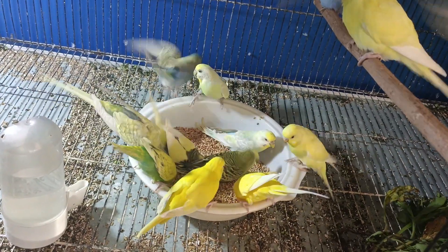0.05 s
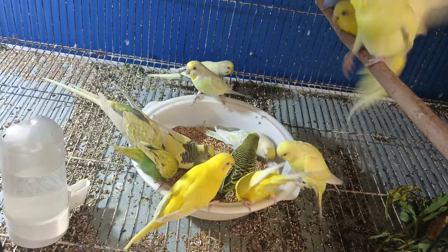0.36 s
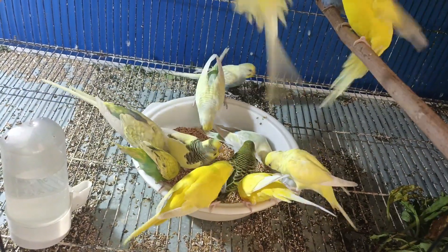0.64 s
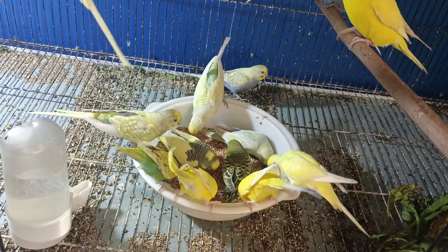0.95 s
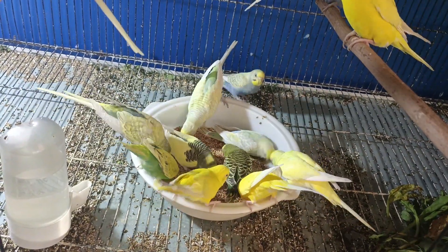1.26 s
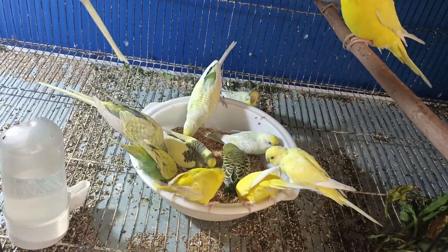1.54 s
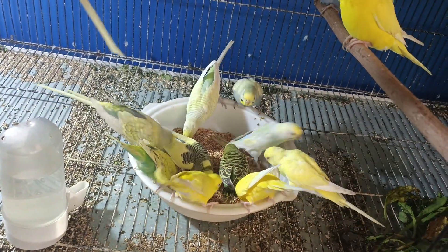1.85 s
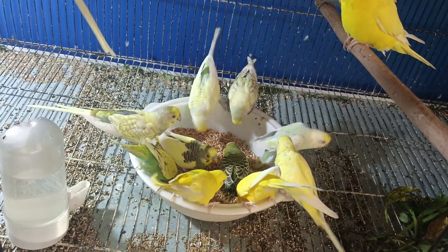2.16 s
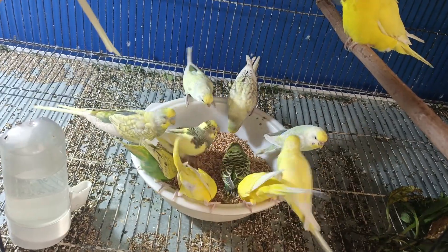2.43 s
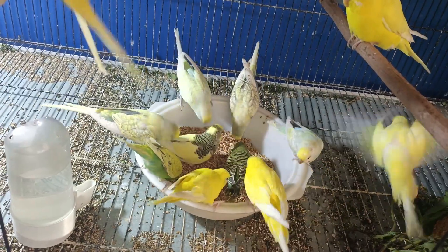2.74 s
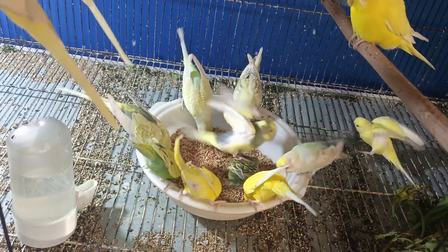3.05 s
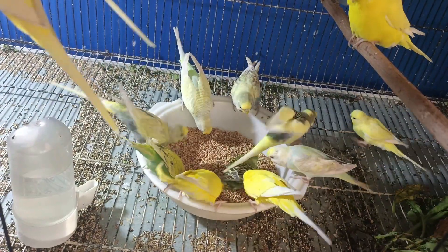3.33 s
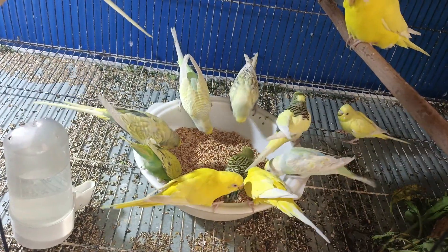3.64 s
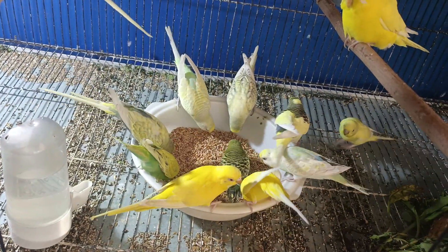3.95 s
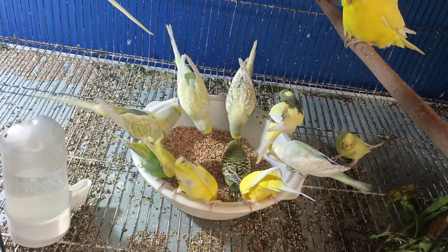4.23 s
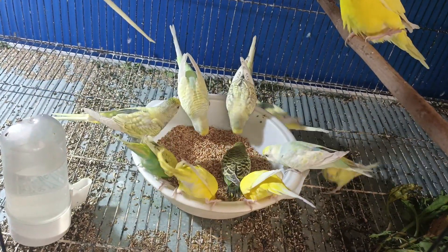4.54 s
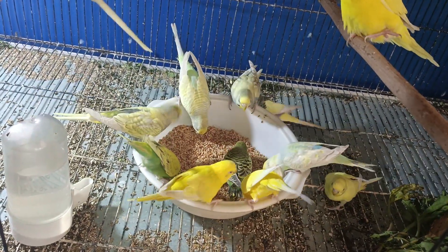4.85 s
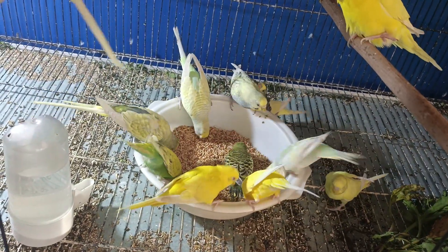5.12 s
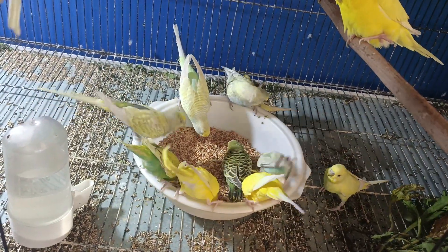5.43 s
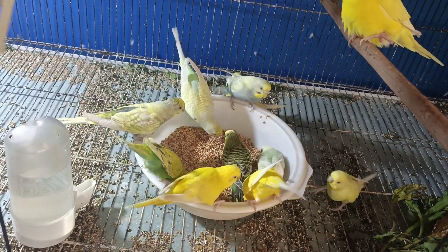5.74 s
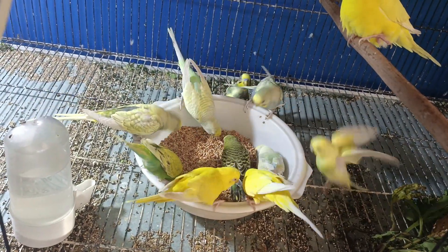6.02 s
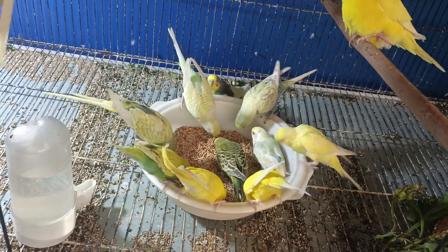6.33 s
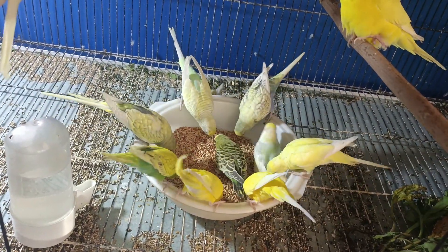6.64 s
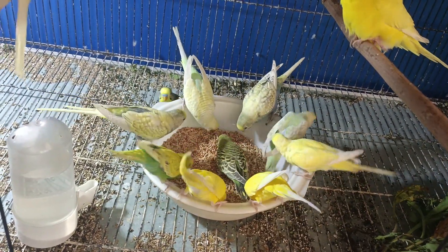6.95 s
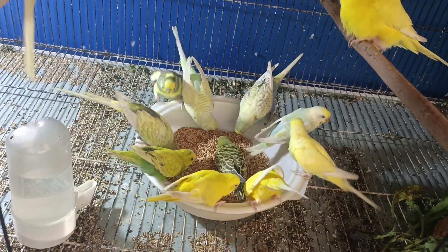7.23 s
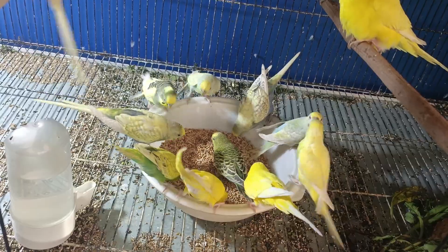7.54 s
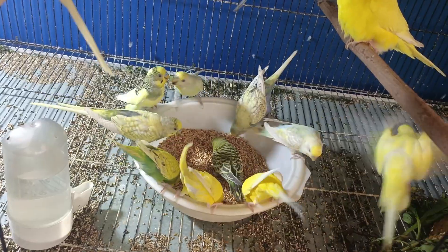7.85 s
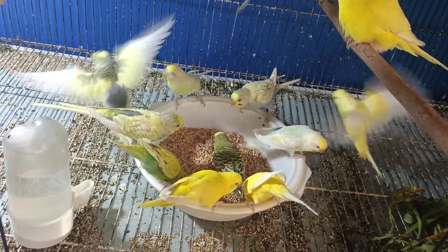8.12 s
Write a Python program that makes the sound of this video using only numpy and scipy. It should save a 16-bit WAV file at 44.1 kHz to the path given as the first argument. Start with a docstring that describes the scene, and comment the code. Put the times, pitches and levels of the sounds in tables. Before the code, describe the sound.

A caged flock of small parrots chatters close by, with raspy begging, quick pips, fluttering wings and pecks at seed.

```python
"""Budgerigars at the seed bowl

Indoors, close to a wire cage in a small hard room, on a spaced pair of microphones. Each bird's syrinx
whistles gliding chirps and arched pips, chucks hoarsely or squawks in buzzing bursts, while young birds
beg in rattling pulses. Wings push air, feet thud on the cage, and beaks and claws tick on seed and wire.
Soft twitters and hollow tones come from further off, and the walls answer."""
import sys
import numpy as np
from scipy import signal
from scipy.fft import rfft, irfft, next_fast_len
from scipy.io import wavfile
from scipy.ndimage import map_coordinates

SR = 44100
rng = np.random.default_rng(int(sys.argv[2]) if len(sys.argv) > 2 else 0)


def waveform_to_disk(signal):
    """Save audio, clipped to [-1, 1], as 16-bit WAV at the path in sys.argv[1]."""
    frames = np.transpose(np.atleast_2d(signal))
    scaled = np.clip(frames, -1, 1) * 32767
    samples = np.round(scaled).astype(np.int16)
    wavfile.write(sys.argv[1], SR, samples)


N = 365148
NOTE_TIME = np.arange(6144) / SR  # seconds, room for one call


def amp(db):
    """Decibels to gain."""
    return np.exp(np.asarray(db) * (np.log(10) / 20))


def unit(x):
    """Scale to rms 1."""
    return x / np.sqrt(np.mean(x ** 2) + 1e-20)


def along(points, hz):
    """Read (Hz, value) points on a log frequency axis."""
    f, v = np.transpose(points)
    return np.interp(np.log(hz + 1), np.log(f + 1), v)


def wobble(rate, size=N):
    """A smooth random curve, rate knots a second."""
    knots = np.random.default_rng(rng.integers(2 ** 31)).standard_normal(int(size * rate / SR) + 4)
    steps = np.arange(len(knots) * 8) / 8
    smooth = map_coordinates(knots, [steps], mode="nearest")
    return np.interp(np.arange(size) * rate / SR, steps, smooth)


def filtered(x, response):
    """Pass x through a complex response of frequency."""
    size = x.shape[-1]
    m = next_fast_len(size + 2048)
    return irfft(rfft(x, m) * response(np.fft.rfftfreq(m, 1 / SR)), m)[..., :size]


def resonance(f, centre_hz, width_hz):
    """Response of one damped resonance."""
    return 1j * f * width_hz / (centre_hz ** 2 - f * f + 1j * f * width_hz)


def hiss(colour, shape):
    """Noise of rms 1 with a (Hz, dB) spectrum."""
    return unit(filtered(rng.standard_normal(shape), lambda f: amp(along(colour, f))))


def stereo_noise(colour, apart):
    """Wide noise of rms 1; apart is the gain of side against mid."""
    mid, side = hiss(colour, (2, N))
    return unit(np.array([mid + apart * side, mid - apart * side]))


def add(track, s, sound):
    """Mix a sound into a track at s seconds."""
    start = int(np.clip(round(s * SR), 0, N - 1))
    track[..., start:start + sound.shape[-1]] += sound[..., :N - start]


def swell(u, edge):
    """Envelope over u = 0..1 with rounded edges."""
    return np.sin(np.pi / 2 * np.clip(np.minimum(u, 1 - u) / edge, 0, 1)) ** 2


def bouts(rows, attack_s, release_s):
    """One dB curve per level column: each bout rises, holds and falls; the times are for 60 dB."""
    t = np.arange(0, N, 64) / SR
    levels = []
    for s, length, *held_db in rows:
        outside = np.maximum((s - t) / attack_s, (t - s - length) / release_s)
        levels.append(np.add.outer(held_db, -60 * np.maximum(0, outside)))
    loudest_db = np.maximum(np.max(levels, axis=0), -120)
    return [np.interp(np.arange(N) / SR, t, db) for db in loudest_db]


def spaced(x, pan_db, delay_ms):
    """A voice reaches the left microphone pan_db louder and delay_ms later than the right."""
    pair = filtered(x, lambda f: np.exp(np.outer([-1, 1], 1j * np.pi * f * delay_ms / 1000)))
    return pair * amp([[pan_db / 2], [-pan_db / 2]])


def perch(call, pan_db, delay_ms, walls_db, latest_s=0.012):
    """A call reaches the pair directly and in eight early echoes off cage floor and walls."""
    direct = spaced(call, pan_db, delay_ms)
    echoes = np.zeros((2, len(call)))
    for mic in echoes:
        signs = rng.choice([-1, 1], size=8)
        mic[(rng.uniform(0.001, latest_s, size=8) * SR).astype(int)] = signs / np.sqrt(8)
    return direct + amp(walls_db) * signal.fftconvolve(direct, echoes, axes=1)[:, :len(call)]


def syrinx(hz, overtones_db):
    """A whistle with weaker overtones on a moving pitch."""
    phase = 2 * np.pi * np.cumsum(hz) / SR
    overtones = (amp(db) * np.sin(k * phase) * (k * hz < SR / 2) for k, db in enumerate(overtones_db, 2))
    return np.sin(phase) + sum(overtones)


def reed(hz, colour, count=8):
    """A buzzy voice: harmonics weighted by a throat whose resonances keep shifting."""
    phase, voice = 2 * np.pi * np.cumsum(hz) / SR, 0
    for k in range(1, count + 1):
        throat_db = along(colour, k * hz) + 2.5 * wobble(50, len(hz))
        voice += amp(throat_db) * np.sin(k * phase) * (k * hz < SR / 2)
    return unit(voice)


# Spectrum of the quiet room behind the birds: (frequency [Hz], level [dB])
ROOM_TONE = [(25, -29), (60, -5.5), (130, 3), (300, -7), (700, -6), (1200, -3), (2000, -6.5), (3100, -2.5),
             (4500, -48), (8000, -9), (11000, -45.5), (15500, -45.5)]


def room_tone(level_db=-63.5):
    """A faint bed of noise whose level wavers slightly."""
    return amp(level_db + 1.5 * wobble(6)) * stereo_noise(ROOM_TONE, apart=0.39)


# Single pips, close and a little left: (time [s], length [s], top pitch [Hz], level [dB])
PIPS = [(0, 0.009, 3386, -18.5), (0.252, 0.024, 3126, -31), (2.623, 0.018, 3080, -50.5),
        (3.204, 0.013, 2830, -44.5), (0.478, 0.038, 2726, -31), (0.713, 0.022, 2588, -40),
        (0.794, 0.051, 3020, -36.5), (0.982, 0.014, 3610, -58), (2.249, 0.026, 3280, -40.5),
        (2.58, 0.023, 3223, -34), (2.783, 0.0406, 3310, -34.5), (2.893, 0.035, 3170, -44.5),
        (3.136, 0.014, 2840, -38.5), (3.165, 0.0155, 2560, -41.5), (3.295, 0.03, 3180, -39.5),
        (3.38, 0.0248, 3120, -38.5), (3.644, 0.028, 3150, -30.5), (7.511, 0.027, 2820, -36.5),
        (7.573, 0.028, 2760, -36), (7.642, 0.012, 2610, -33.5), (7.789, 0.033, 3050, -35.5),
        (7.899, 0.014, 3440, -25)]


def pips(rows, droop=0.2016, flutter=0.018, scrape_db=-17, gain_db=2.5, shake_db=1.37):
    """Each pip leaps up to its pitch and drops again; it scrapes as the syrinx starts and stops."""
    out, t = np.zeros((2, N)), NOTE_TIME
    for s, length, top_hz, db in rows:
        u = np.clip(t / length, 0, 1)
        depth = droop * (1 + 0.4 * rng.uniform(-0.98, 1))
        arch = 1 - depth * abs(2 * u ** rng.uniform(0.797, 1.325) - 1) ** 2.49
        hz = top_hz * arch * (1 + flutter * wobble(686, len(t)))
        reedy_db = -0.8 * max(db + 35.5, 0) + 2 * rng.standard_normal(3)  # loud pips are purer
        tone = unit(syrinx(hz, overtones_db=reedy_db + [-18, -19, -17])) * swell(u, edge=0.3)
        tone *= amp(shake_db * wobble(200, len(t)))
        white = rng.standard_normal(len(t))
        scrape = unit(filtered(white, lambda f: resonance(f, 4400, 4400) * resonance(f, 6000, 9700)))
        ends = swell(u / 0.36, edge=0.25) + 0.5 * swell((1 - u) / 0.25, edge=0.46)
        call = amp(db + gain_db) * (tone + amp(scrape_db) * scrape * ends)
        add(out, s, perch(call, pan_db=4.5, delay_ms=0.04, walls_db=-10))
    return out


# Wingbeats near the microphones: (time [s], length [s], air [dB], whoosh [dB], feathers [dB])
FLURRIES = [(0.005, 0.2, -50, -43, -55), (0.27, 0.11, -55, -42.5, -42.5), (.42, 0.043, -57, -46, -44.5),
            (0.53, 0.14, -54, -53.5, -60), (0.83, 0.11, -49.5, -69, -80), (1.35, 0.042, -69, -63, -61.5),
            (2.56, 0.086, -42.5, -53.5, -63), (2.99, 0.03, -56.5, -67, -80), (3.42, 0.042, -63, -81, -72),
            (3.7, 0.078, -49, -66, -72), (4.42, 0.26, -61.5, -77.5, -86), (5.1, 0.35, -67.5, -84, -85),
            (5.8, 0.089, -64, -81, -82), (6.03, 0.22, -69.5, -85, -90), (7.86, 0.4, -61.5, -79, -73),
            (8.18, 0.07, -54.5, -67.5, -77)]
# Spectra of pushed air, wing whoosh and feather rustle: (frequency [Hz], level [dB])
AIR_COLOUR = [(15, -65), (25, -22), (50, 9), (72, 11), (125, 14), (200, -3.5), (340, -31.5), (500, -11),
              (650, -36), (1100, -100)]
WHOOSH_COLOUR = [(40, -24.5), (100, 0.5), (170, 5), (260, -2), (430, -4.5), (560, -9.5), (800, -30.5),
                 (2000, -38)]
FEATHER_COLOUR = [(150, -17), (400, -9.5), (600, 0.5), (850, 0), (1150, -5.5), (1500, 0), (3000, -8),
                  (5000, -24), (12000, -25)]


def wings(stroke_hz=37, beat_db=3.5):
    """Up and down strokes push air at the microphones; wings whoosh softly and feathers rustle."""
    air_db, whoosh_db, feather_db = bouts(FLURRIES, attack_s=0.17, release_s=0.56)
    turns = np.cumsum(stroke_hz * (1 + 0.154 * wobble(6.7))) / SR
    beats = unit(amp(beat_db * np.cos(2 * np.pi * turns)))
    air = amp(air_db) * stereo_noise(AIR_COLOUR, apart=0.47)
    whoosh = amp(whoosh_db) * stereo_noise(WHOOSH_COLOUR, apart=0.33)
    feathers = amp(feather_db) * stereo_noise(FEATHER_COLOUR, apart=0.88)
    return beats * (air + whoosh + feathers)


# Squawks in the cage: (time [s], length [s], throat [Hz], throat level [dB], hiss level [dB],
# narrow ring [gain], left over right [dB], left delay [ms])
SQUAWKS = [(0.048, 0.042, 3820, -20, -24, 0.055, 4, -0.22),
           (0.167, 0.045, 3990, -18.5, -24, 0.059, 2, -0.19),
           (0.525, 0.041, 3580, -21, -37.5, 0.91, -0.5, 0.14),
           (0.567, 0.025, 3730, -23.5, -24, 0.91, 4.5, 0.19), (2.299, 0.064, 2820, -43, -56, 0.27, 1, 0.22),
           (2.442, 0.14, 2480, -46.5, -72, 0.12, 6.5, -0.29),
           (1.909, 0.04, 2770, -47, -62, 0.18, 0, -0.0098), (3.226, 0.024, 3720, -39.5, -46, 1, 2.5, 0.24),
           (8.06, 0.095, 3330, -28.5, -38.5, 0.43, 2.5, 0.13)]


def squawks(buzz_hz=190):
    """The syrinx slaps open in rapid puffs that ring the throat and a hissing upper resonance."""
    out, t = np.zeros((2, N)), NOTE_TIME
    for s, length, throat_hz, throat_db, hiss_db, ring, pan_db, delay_ms in SQUAWKS:
        cycle = np.cumsum(buzz_hz * (1 + 0.086 * wobble(90, len(t)))) / SR % 1
        puffs = np.exp(-cycle) * rng.standard_normal(len(t)) * swell(t / length, edge=0.084)
        band = lambda hz, width_hz: unit(filtered(puffs, lambda f: resonance(f, hz, width_hz) ** 2))
        throat = ring * band(throat_hz, 480) + 0.84 * band(throat_hz, 2460)
        call = (amp(throat_db) * throat + amp(hiss_db) * band(5760, 2700)) * np.sqrt(length / t[-1])
        add(out, s, perch(call, pan_db, delay_ms, walls_db=-2.5))
    return out


# Rummaging in the seed bowl: (time [s], length [s], level [dB])
RUMMAGES = [(0.05, 0.23, -34.5), (.24, 0.28, -50), (.5, 0.12, -37.5), (.62, .28, -47), (1.51, 0.17, -58),
            (1.79, 0.058, -67), (1.97, 0.17, -58), (2.17, .05, -57), (2.33, 0.13, -56.5),
            (2.53, 0.13, -61.5), (2.68, 0.093, -62.5), (3, .04, -64), (3.16, 0.097, -52), (3.33, 0.33, -60),
            (3.7, 0.038, -55), (3.79, 0.018, -54.5), (3.87, 0.045, -53), (4.05, .015, -59),
            (4.84, 0.026, -66), (5.38, 0.024, -50), (5.65, 0.031, -69), (5.842, .015, -50.5),
            (6.3, 0.081, -56.5), (6.785, 0.035, -63.5), (6.922, .03, -49.5), (6.975, 0.079, -47.5),
            (7.205, .015, -67)]
# Spectrum of shifting husks: (frequency [Hz], level [dB])
HUSK_COLOUR = [(600, -21), (1500, -17), (3000, 7), (8000, 4), (11500, 4), (15500, -3.5)]


def husks(nibble_db=-76, clump_db=4, grain_db=2):
    """Seed husks shift in short, grainy rustles over faint, constant nibbling."""
    rummage_db, = bouts(RUMMAGES, attack_s=0.04, release_s=0.16)
    level_db = np.maximum(nibble_db + 4 * wobble(14), rummage_db)
    grains = amp(clump_db * wobble(70) + grain_db * wobble(900))
    return amp(level_db) * unit(grains * stereo_noise(HUSK_COLOUR, apart=0.9))


# Close whistles: (time [s], length [s], start [Hz], end [Hz], level [dB], left over right [dB])
CHIRPS = [(0.081, 0.029, 2990, 3345, -25, 5), (0.109, 0.0211, 3466, 2744, -20.5, 2),
          (0.124, 0.024, 2770, 1713, -25, 4.5), (0.713, 0.013, 3120, 5120, -31.5, 4),
          (0.765, 0.017, 3390, 4600, -37.5, -1), (0.82, 0.02, 3690, 4460, -38.5, 2),
          (0.847, 0.024, 3140, 2350, -30.5, 3.5), (0.884, 0.047, 4090, 4600, -35.5, 2),
          (0.885, 0.036, 3275, 2820, -41, 12.5), (0.917, 0.019, 3750, 3305, -20.5, 4),
          (0.937, 0.03, 3930, 2235, -27, -1), (0.962, 0.022, 3980, 2646, -24, 3),
          (0.986, 0.016, 2040, 1814, -31, -2.5), (1.078, 0.013, 4230, 3080, -27.5, 5),
          (1.086, 0.018, 4300, 3820, -31, 2), (1.579, 0.019, 1650, 1836, -42, -1),
          (3.343, 0.023, 1750, 1785, -57.5, 11), (1.109, 0.038, 4546, 2382, -30.5, 1.5),
          (1.141, 0.01, 3020, 3220, -22.5, 1.5), (1.477, 0.022, 2340, 2720, -35, 3.5),
          (2.326, 0.024, 1370, 1338, -33.5, -1.5), (2.376, 0.13, 1398, 1634, -45, -2),
          (2.497, 0.052, 1572, 1272, -42.5, 5), (1.051, 0.015, 4930, 5400, -35, 0.5),
          (3.245, 0.0218, 3340, 2570, -40.5, -4), (3.607, 0.032, 3730, 2760, -31, -3),
          (3.668, 0.021, 2960, 1578, -28.5, -1.5), (4.109, 0.025, 2050, 3720, -32, 5),
          (4.132, 0.029, 3354, 2190, -28, 7), (4.185, 0.03, 2650, 2370, -32.5, -12),
          (4.227, 0.021, 2460, 1720, -43, 22), (4.139, 0.033, 3930, 4300, -26.5, -2),
          (4.164, 0.022, 4375, 2840, -20.5, -3), (4.188, 0.015, 2970, 2370, -28, 16),
          (4.212, 0.016, 3950, 3400, -24.5, -1), (4.392, 0.016, 4060, 2330, -28.5, 0),
          (4.399, 0.045, 3670, 4280, -30, 6.5), (4.408, 0.025, 2067, 2250, -26, 3.5),
          (4.443, 0.026, 4310, 3320, -25.5, -1.5), (4.468, 0.031, 3173, 2830, -22, 3.5),
          (4.496, 0.014, 2860, 3353, -21, 5.5), (5.432, 0.035, 3510, 2300, -32, 1.5),
          (5.459, 0.034, 2133, 2554, -25, 5), (5.73, 0.017, 4210, 3631, -32, -7.5),
          (7.69, 0.012, 2150, 1740, -30.5, 5), (7.326, 0.033, 2490, 2010, -44.5, 7),
          (7.928, 0.023, 2750, 1664, -28, -2)]


def chirps(flutter=0.045, shake_db=2, breath_db=-13, gain_db=1, stutter_hz=105, beat_hz=780):
    """Gliding, stuttering whistles; a second, slower syrinx vibration adds scratchy sidebands."""
    out, t = np.zeros((2, N)), NOTE_TIME
    for s, length, start_hz, end_hz, db, pan_db in CHIRPS:
        u = np.clip(t / length, 0, 1)
        glide_hz = end_hz + (start_hz - end_hz) * (1 - u) ** 1.3  # quick at first, then settling
        hz = glide_hz * (1 + flutter * wobble(690, len(t)))
        tone = syrinx(hz, overtones_db=np.array([-24, -36, -36]) + 4 * rng.standard_normal())
        tone *= amp(shake_db * wobble(257, len(t)))
        slow_vibration = syrinx(beat_hz * (1 + 0.252 * wobble(198.5, len(t))), overtones_db=[-8])
        tone = unit(tone * (3.5 + 0.55 * slow_vibration))
        white = rng.standard_normal(len(t))
        breath = unit(filtered(white, lambda f: resonance(f, (start_hz + end_hz) / 2, 1000) ** 2))
        turns = np.cumsum(stutter_hz * (1 + 0.38 * wobble(73, len(t)))) / SR
        stutter_db = 3.5 * np.cos(2 * np.pi * (turns + rng.uniform()))
        call = unit((tone + amp(breath_db) * breath) * amp(stutter_db)) * swell(u, edge=0.15)
        call = filtered(call, lambda f: f ** 6 / (f ** 6 + 1100 ** 6))  # low cut at 1100 Hz
        add(out, s, amp(db + gain_db) * perch(call, pan_db, delay_ms=0.26, walls_db=-7))
    return out


# Landings, centred between the microphones: (time [s], level [dB])
LANDINGS = [(0.139, -29.5), (0.27, -37), (.333, -35), (0.361, -32), (.44, -37), (.465, -38), (0.522, -33),
            (.625, -35), (.78, -41), (0.858, -40), (0.945, -51), (2.551, -47.5), (3.787, -46), (4.529, -62),
            (4.652, -62), (5.785, -67), (8.195, -54)]
# Low modes of bowl and cage floor: (frequency [Hz], level [dB], t60 [s])
CAGE_MODES = [(71.6, -7, .22), (140, -3, 0.15), (216, 0, 0.069), (243, -15, 0.041), (360, -16.5, 0.03),
              (454, -12, 0.099)]


def thuds(attack_s=0.011):
    """Soft feet knock the low modes of the bowl and the cage floor."""
    out, t = np.zeros(N), np.arange(SR // 4) / SR
    attack = 1 - np.exp(-t / attack_s)
    for s, db in LANDINGS:
        for hz, mode_db, t60 in CAGE_MODES:
            level_db = db + mode_db + 2 * rng.standard_normal() - 60 * t / t60
            add(out, s, amp(level_db) * attack * np.sin(2 * np.pi * (hz * t + rng.uniform())))
    return out


def far_twitters(level_db=-60, spread_db=1.5, count=40):
    """Birds further off twitter in short, soft glides at random pitches."""
    out, t = np.zeros((2, N)), NOTE_TIME[:4096]
    for when, span, height, slope, side in rng.uniform(size=(count, 5)):
        u = np.clip(t / (0.014 + 0.02 * span), 0, 1)
        hz = 1900 * 1.8 ** height * (1 + 0.6 * (slope - 0.5) * u + 0.05 * wobble(700, len(t)))
        note = unit(syrinx(hz, overtones_db=[-10 - 15 * height, -26])) * swell(u, edge=0.083)
        note *= amp(level_db + spread_db * rng.standard_normal())
        add(out, when * N / SR, perch(note, 8 * (side - 0.5), 0.77 * (side - 0.5), walls_db=-2))
    return out


# Close taps on seed, bowl and wire: (time [s], level [dB])
TICKS = [(0.3653, -26), (0.4178, -20.5), (0.6775, -29), (0.761, -30), (1.5008, -35.5), (1.667, -35),
         (1.783, -22), (2.0824, -36), (2.588, -40), (2.6334, -39.5), (3.172, -31.5), (3.348, -41.5),
         (5.265, -38), (5.8438, -27), (5.989, -34.5), (6.176, -43), (6.293, -38), (6.495, -45),
         (6.7848, -36.5), (6.926, -42), (6.983, -31.5), (7.2142, -53)]
# Spectrum of a tap: (frequency [Hz], gain [dB])
TICK_COLOUR = [(300, -44), (1200, -3.5), (3000, 3.5), (8000, -1.5), (10000, -5.5), (11500, 9), (14000, -8),
               (16000, 2)]


def ticks(crack_t60=0.0015, tail_t60=0.064, gain_db=3):
    """A beak or claw strikes: a sharp crack of noise with a short tail."""
    out, t = np.zeros((2, N)), NOTE_TIME[:2048]
    decay = amp(-60 * t / crack_t60) + 0.34 * amp(-60 * t / tail_t60)
    for s, db in TICKS:
        add(out, s, amp(db + gain_db) * decay * rng.standard_normal((2, len(t))))
    return filtered(out, lambda f: amp(along(TICK_COLOUR, f)))


# Chucks near the centre: (time [s], length [s], pitch [Hz], level [dB])
CHUCKS = [(0.484, 0.0191, 1223, -28), (0.61, 0.016, 1181, -25.5), (0.706, 0.0252, 1197, -37),
          (0.799, 0.014, 1780, -32.5), (0.82, 0.013, 1378, -39), (1.902, 0.011, 2153, -37.5),
          (1.914, 0.041, 1703, -39), (1.981, 0.027, 2226, -53), (2.049, 0.02, 2127, -40.5),
          (2.092, 0.0081, 2153, -36), (2.164, 0.021, 1275, -45.5), (2.456, 0.0128, 1550, -46),
          (2.494, 0.016, 1500, -44), (5.556, 0.0211, 1057, -31.5), (5.626, 0.025, 2120, -39),
          (5.715, 0.015, 1655, -34), (5.738, 0.025, 1350, -39), (5.838, 0.0271, 1332, -29),
          (5.911, 0.014, 2280, -31.5), (6.591, 0.013, 2070, -66), (7.517, 0.017, 1840, -49),
          (7.975, 0.021, 1716, -34), (8.042, 0.022, 1917, -30)]
# Throat resonances of a chuck: (frequency [Hz], gain [dB])
CHUCK_THROAT = [(900, -23), (1400, 5), (2000, 7.5), (3300, 5), (4200, 11), (5000, -2), (6500, -12),
                (8000, -8.5), (11000, -28), (15000, -34.5)]


def chucks(rise=0.262, arch=0.048, rough=0.07, breath_db=-9):
    """Hoarse, breathy notes rich in overtones; the pitch climbs, arches and shakes."""
    out, t = np.zeros((2, N)), NOTE_TIME
    for s, length, pitch_hz, db in CHUCKS:
        u = np.clip(t / length, 0, 1)
        bend = arch * (np.sin(np.pi * u) - 0.5) + rough * wobble(1100, len(t))
        hz = pitch_hz * (1 + rise * (u - 0.5)) * (1 + bend)
        breath = amp(breath_db) * hiss(CHUCK_THROAT, len(t))
        call = amp(db) * (reed(hz, CHUCK_THROAT) + breath) * swell(u, edge=0.15)
        add(out, s, perch(call, pan_db=1.5, delay_ms=rng.uniform(-0.33, 0.38), walls_db=-7))
    return out


# Hollow tones from further off: (time [s], length [s], pitch [Hz], level [dB])
HUMS = [(.65, 0.15, 508.5, -57), (.93, 0.098, 503, -58.5), (1.33, .09, 1252, -55.5),
        (2.211, 0.038, 310, -56.5), (2.234, 0.21, 574.6, -53.5), (2.267, 0.3, 794, -55.5),
        (2.547, 0.1, 466, -44.5), (3.197, 0.073, 615, -61.5), (3.7, 0.092, 514.5, -56),
        (4.713, 0.0589, 700, -54), (4.88, 0.19, 801, -57), (5.75, 0.12, 525, -56.5),
        (8.028, 0.28, 695, -59.5)]


def hums(waver=0.032):
    """Faint tones waver, swell and fade, about half direct and half off the walls."""
    out, t = np.zeros(N), np.arange(SR // 2) / SR
    for s, length, hz, db in HUMS:
        tone = syrinx(hz * (1 + waver * wobble(55.3, len(t))), overtones_db=[-16])
        add(out, s, amp(db) * unit(tone) * swell(t / length, edge=0.065))
    return 0.6 * out + 0.67 * room(np.array([out, out]), count=1)


# Begging, mostly to the left: (time [s], length [s], peep rate [Hz], pitch [Hz], fundamental [dB],
# rasp [dB], hoarseness [0-1], left over right [dB])
BEGGING = [(1.207, 0.42, 25, 967, -67, -53.5, 0.24, 3.5), (1.64, 0.41, 27.6, 980, -53, -52, 0.27, 1),
           (2.047, 0.19, 25, 1020, -53.5, -67, 0.3, 7), (2.476, 0.074, 31.5, 1010, -46.5, -50, 0.28, -5),
           (2.934, 0.15, 28.5, 980, -55, -71.5, 0.2, 1), (3.519, .11, 30, 969, -53.5, -70, 0.2, -9),
           (3.949, 0.82, 37.7, 1038, -46.5, -39.5, 0.81, 3.5), (4.72, 1.14, 36.3, 1024, -47, -39, 0.82, 4),
           (5.938, 0.33, 36.6, 972, -52, -47.5, 0.44, 6), (6.305, 0.3, 33, 1034, -53, -51, .1, 10),
           (6.575, 0.33, 32, 1031, -58.5, -49, .4, 10.5), (7.047, 0.25, 31.5, 985, -58, -55.5, 0.19, 12),
           (7.342, 0.16, 34, 1020, -65.5, -61, 0.23, 11.5), (7.555, 0.51, 31.5, 1053, -58.5, -56, 0.26, 13)]
# Throat resonances of a young bird: (frequency [Hz], gain [dB])
YOUNG_THROAT = [(710, -56), (1200, -25), (1500, -5.5), (1900, 0), (2500, -1.5), (3150, -5.5), (3640, -9),
                (4130, -7.5), (4740, -20.5), (5670, -14.5), (6580, -25.5), (7790, -19.5), (11200, -50),
                (15000, -56.5)]


def begging(uneven_db=2, breath_db=-3, rough=0.06, duty=0.72, fade_s=0.027):
    """Young birds beg in runs of arched peeps, each with its own pitch, strength and brightness."""
    out = np.zeros((2, N))
    for s, length, rate, pitch_hz, low_db, rasp_db, hoarse, pan_db in BEGGING:
        t = np.arange(int(length * SR)) / SR
        turns = np.cumsum(rate * (1 + 0.05 * wobble(25, len(t)))) / SR
        per_peep = lambda: rng.standard_normal(128)[turns.astype(int)]
        u = np.clip(turns % 1 / duty, 0, 1)
        arch = 0.04 * (np.sin(np.pi * u) - 0.8)
        hz = pitch_hz * (1 + arch + 0.018 * per_peep() + 0.008 * wobble(150, len(t)))
        shaky_hz = hz * (1 + hoarse * (0.073 * per_peep() + rough * wobble(900, len(t))))
        breath = hoarse * amp(breath_db) * hiss(YOUNG_THROAT, len(t))
        rasp = unit((reed(shaky_hz, YOUNG_THROAT) + breath) * amp(uneven_db * per_peep()))
        voice = amp(low_db) * unit(syrinx(hz, overtones_db=[])) + amp(rasp_db) * rasp
        pulses = unit(swell(u, edge=0.41) * amp(uneven_db * per_peep()))
        fade = swell(t / length, edge=fade_s / length)
        add(out, s, spaced(voice * pulses * fade, pan_db, delay_ms=0.3))
    return out


# A second beggar, just left of centre:
# (time [s], length [s], first note rate [Hz], last note rate [Hz], level [dB], strain [0-1])
HOARSE_BOUTS = [(3.515, 0.36, 30.44, 32.7, -37.5, 0.39), (3.832, 0.2, 32.73, 35, -37.5, 0.81),
                (4.049, 0.68, 36.7, 35.37, -51, 0.6), (4.689, 1, 33.92, 31.37, -42.5, 1),
                (5.6, .37, 31.1, 31.73, -33.5, 0.86), (6.618, 0.46, 32.5, 28.84, -34, 0.95)]
# Its throat resonances: (frequency [Hz], gain [dB])
HOARSE_THROAT = [(1000, -27), (1600, -4.5), (2200, 2), (3300, 1.5), (4200, -0.5), (5000, -15.5),
                 (8000, -19.5), (12000, -61)]


def hoarse_begging(note_s=0.0177, top_hz=1663, droop=0.12, breath_db=-1, uneven_db=2.16):
    """A hoarser beggar repeats one short arched note; strain shakes its pitch and makes it breathy."""
    out, t = np.zeros((2, N)), NOTE_TIME[:1024]
    u = np.clip(t / note_s, 0, 1)
    arch = 1 - droop * (2 * u - 1) ** 2
    for start, length, first_rate, last_rate, db, strain in HOARSE_BOUTS:
        s = start
        while s < start + length:
            progress = (s - start) / length
            detune = 0.11 * strain * rng.standard_normal()
            shake = (0.022 + 0.035 * strain) * wobble(1215, len(t))
            hz = top_hz * (arch + detune + shake)
            breath = amp(breath_db) * hiss(HOARSE_THROAT, len(t))
            rasp = reed(hz, HOARSE_THROAT, count=6) + breath
            voice = unit(strain * rasp + (1 - strain) * syrinx(hz, overtones_db=[-3]))
            level_db = db - 9 * progress ** 14 + uneven_db * rng.standard_normal()  # trails off
            note = amp(level_db) * voice * swell(u, edge=0.3)
            add(out, s, spaced(note, pan_db=2, delay_ms=-0.2))
            rate = first_rate + (last_rate - first_rate) * progress
            s += (1 + 0.05 * rng.standard_normal()) / rate
    return out


# One close bird's alarm, swelling and fading: (time [s], length [s], level [dB])
ALARM = [(7.444, 0.029, -38), (7.498, .021, -28.5), (7.554, 0.024, -28), (7.613, 0.023, -25),
         (7.676, 0.028, -23), (7.738, 0.023, -23.5), (7.802, 0.025, -19.5), (7.864, 0.026, -19.5),
         (7.928, .026, -20.5), (7.988, .025, -20), (8.049, 0.03, -22.5), (8.11, .024, -24),
         (8.176, 0.03, -30.5), (8.256, 0.026, -32)]


def alarm(first_hz=3235, step_hz=6.2):
    """A quick run of pips, each a little higher than the last."""
    return pips([(s, length, first_hz + step_hz * k, db) for k, (s, length, db) in enumerate(ALARM)])


# Decay of the small hard room round the cage: (frequency [Hz], t60 [s])
ROOM_DECAY = [(150, 0.12), (1000, 0.36), (3000, 0.45), (7000, 0.29), (14000, 0.12)]


def room(x, count=3, build_s=0.0041):
    """The walls answer diffusely, each frequency dying at its own speed."""
    hz, t, spectra = signal.stft(rng.standard_normal((count, 2, SR // 2)), SR, nperseg=256)
    envelope = amp(-60 * t / along(ROOM_DECAY, hz)[:, None]) * (1 - np.exp(-t / build_s))
    tails = signal.istft(spectra * envelope, SR, nperseg=256)[1]
    # the echoes drift at random among the tails, so repeated calls ring slightly differently
    shares = np.exp(2 * np.array([wobble(16) for _ in tails]))
    shares /= np.linalg.norm(shares, axis=0)
    return sum(signal.oaconvolve(x * share, tail / np.linalg.norm(tail[0]), axes=1)[:, :N]
               for share, tail in zip(shares, tails))


def scene():
    """Near and far birds share the room over its quiet tone."""
    sources = [(chirps() + chucks(), -10), (pips(PIPS) + alarm(), -11.5),  # (sound, room send [dB])
               (squawks(), -9.5), (begging(), -5.5), (hoarse_begging(), -4),
               (ticks() + husks(), -12.5), (far_twitters(), 0)]
    direct = sum(sound for sound, _ in sources)
    reverb = room(sum(amp(send_db) * sound for sound, send_db in sources))
    return direct + reverb + wings() + thuds() + hums() + room_tone()


# Response common to the microphone pair: (frequency [Hz], gain [dB])
MIC_RESPONSE = [(4000, -1.5), (9000, -3), (10300, -12.5), (11500, -28.5), (13000, -14), (15500, -5)]
# Imbalance of the pair: (frequency [Hz], right over left [dB])
MIC_BALANCE = [(30, 4.5), (100, -0.5), (250, -1), (5000, 1), (7000, 2), (8500, -7), (9700, -3.5),
               (11000, -9.5), (12500, 4.5), (15500, -1.5)]


def record(dry, top_hz=15850):
    """Both microphones have a treble notch, the right one lower down, and pass nothing above top_hz."""
    gain_db = lambda f: along(MIC_RESPONSE, f) + np.outer([-0.5, 0.5], along(MIC_BALANCE, f))
    return filtered(dry, lambda f: amp(gain_db(f)) * (f < top_hz))


dry = scene()
out = record(dry)
waveform_to_disk(out)
```